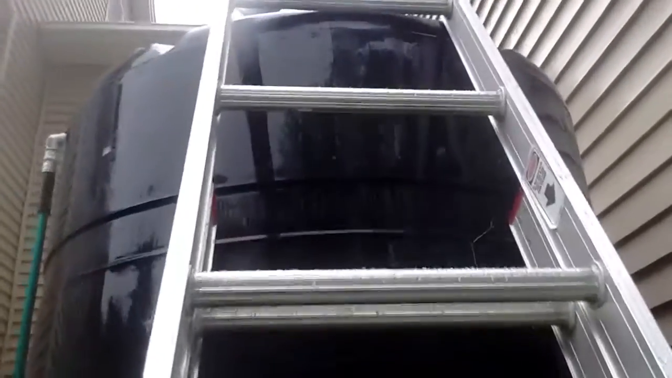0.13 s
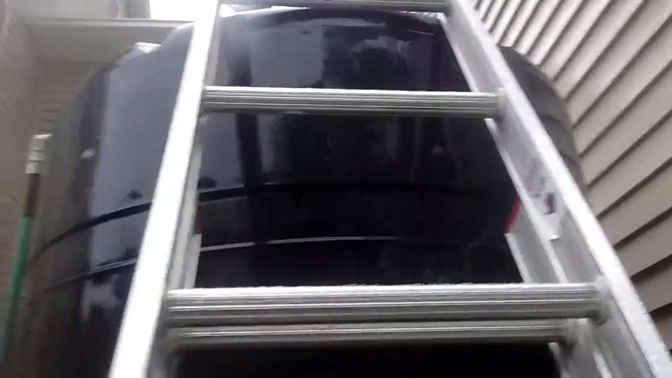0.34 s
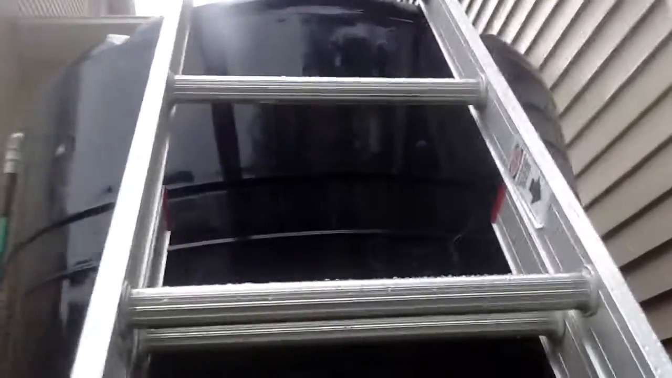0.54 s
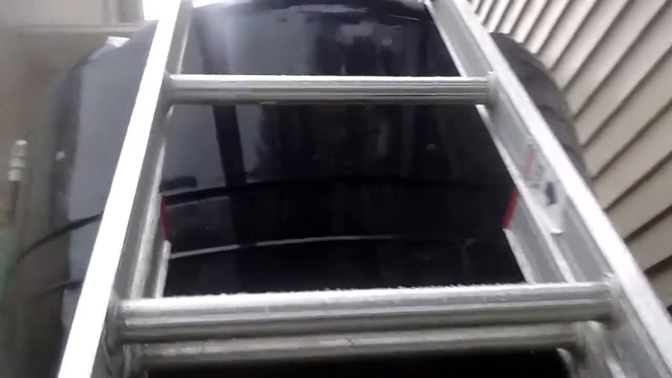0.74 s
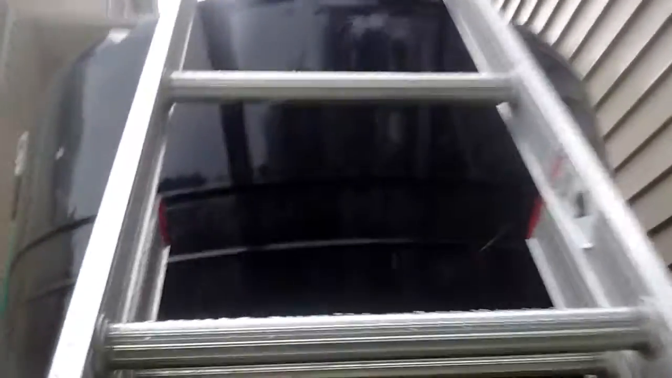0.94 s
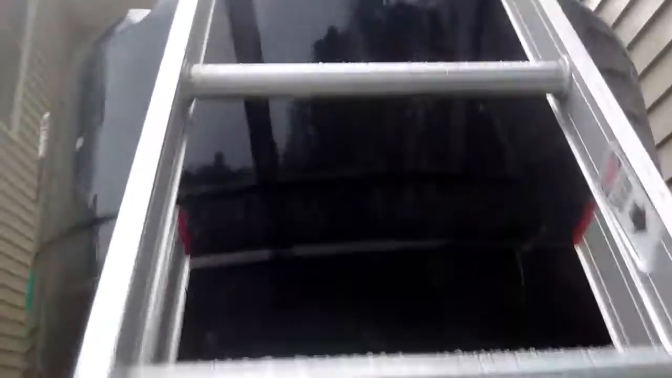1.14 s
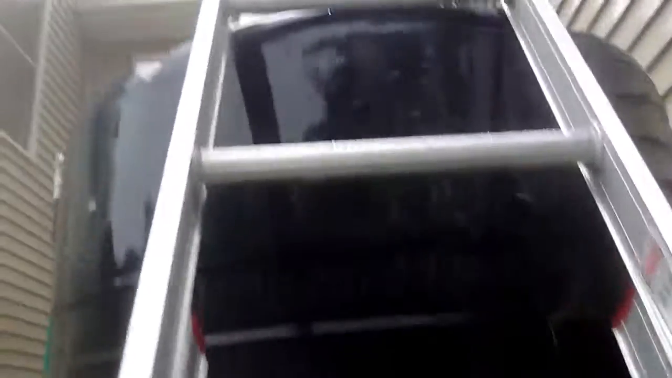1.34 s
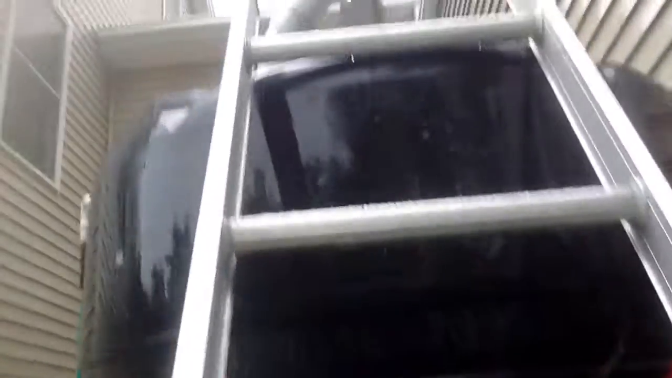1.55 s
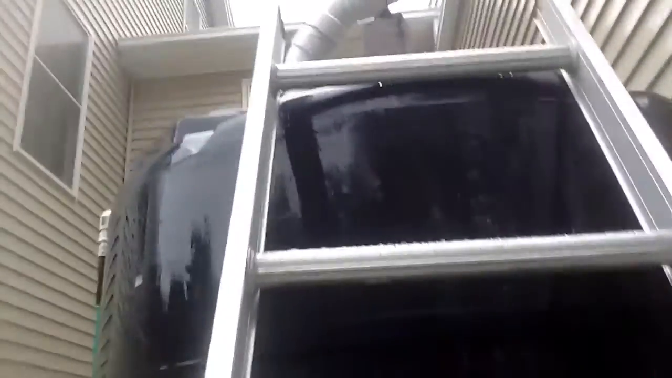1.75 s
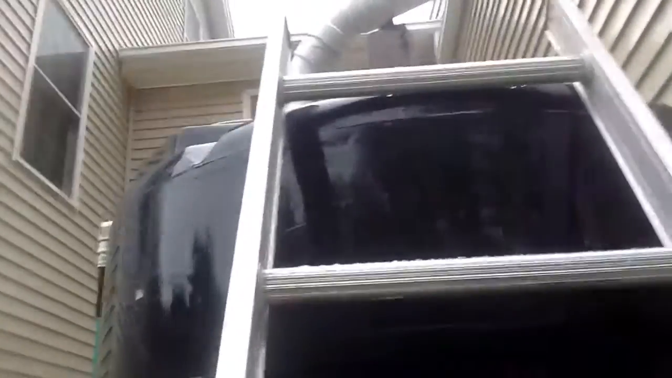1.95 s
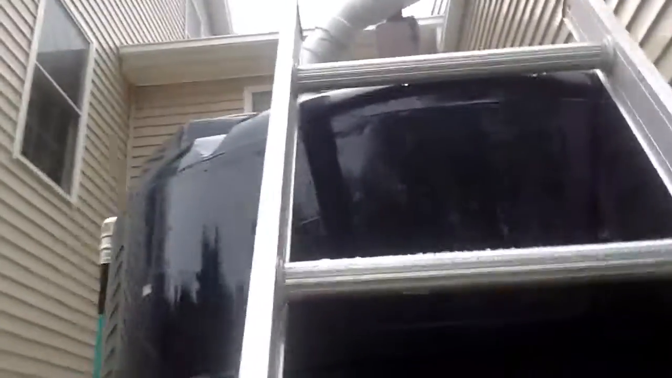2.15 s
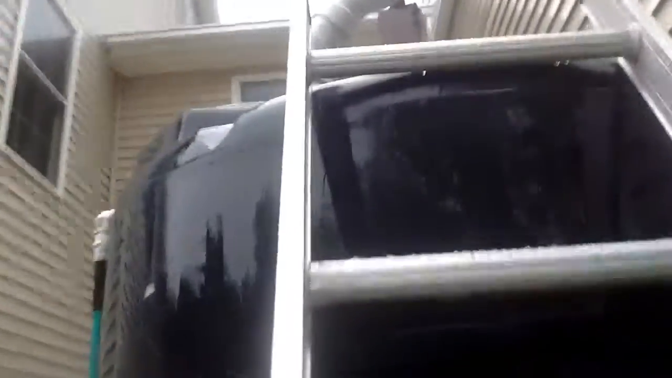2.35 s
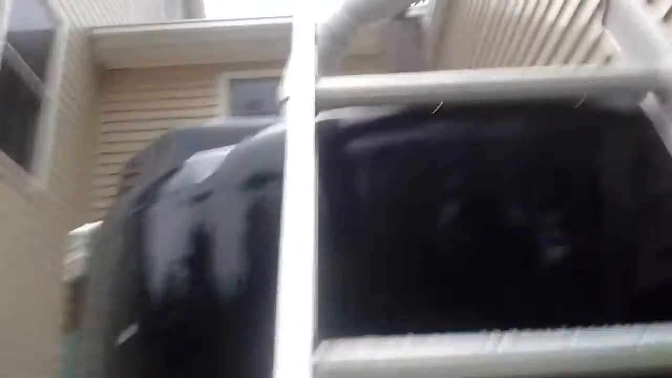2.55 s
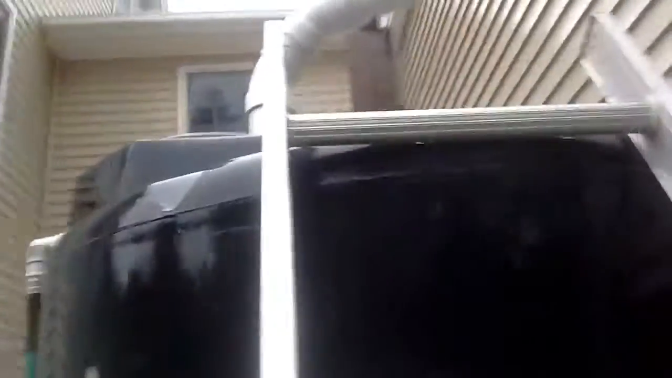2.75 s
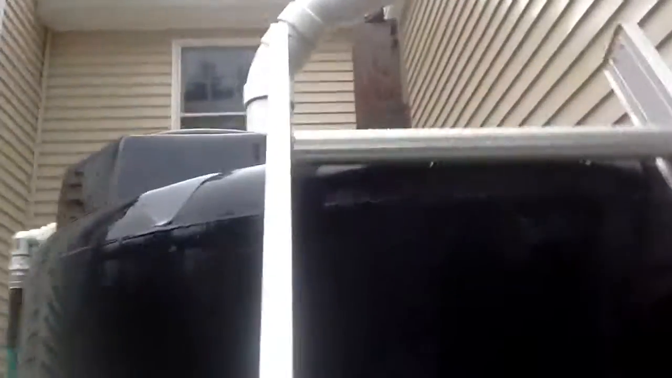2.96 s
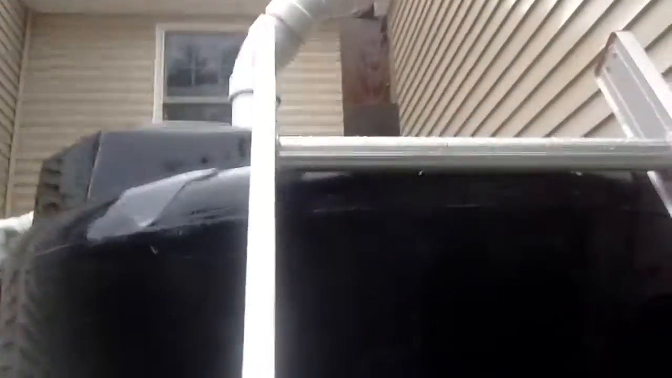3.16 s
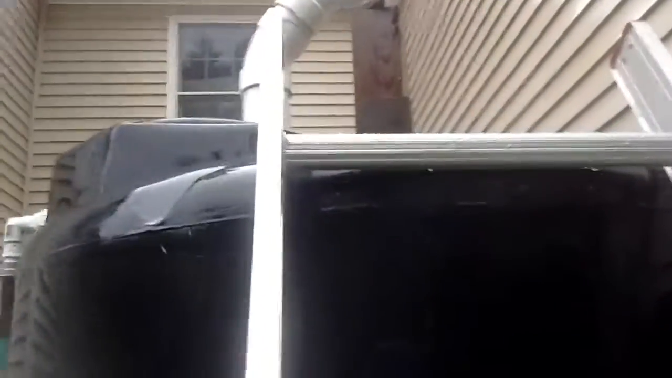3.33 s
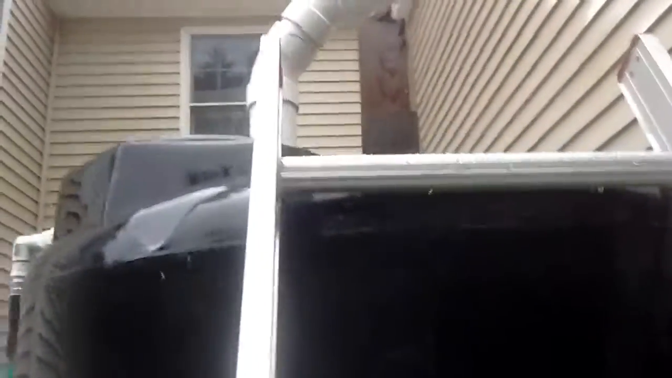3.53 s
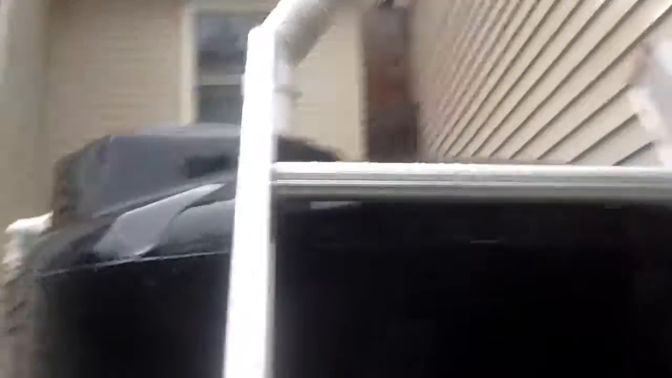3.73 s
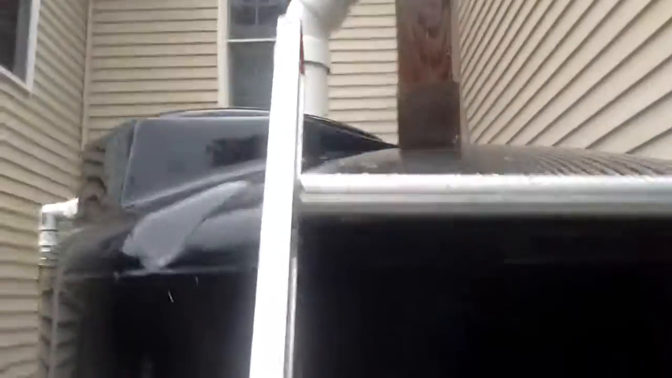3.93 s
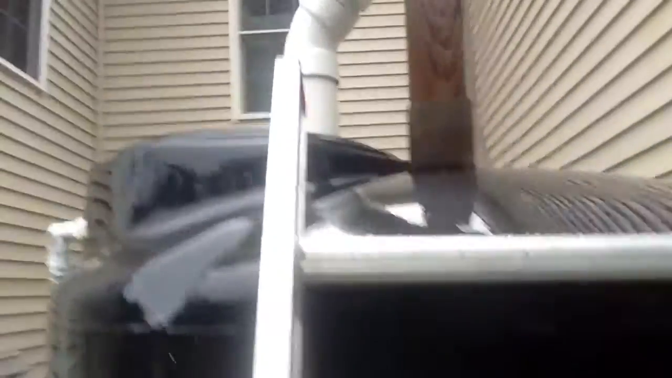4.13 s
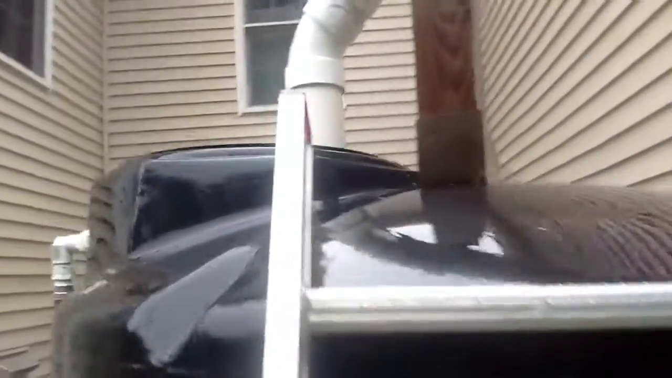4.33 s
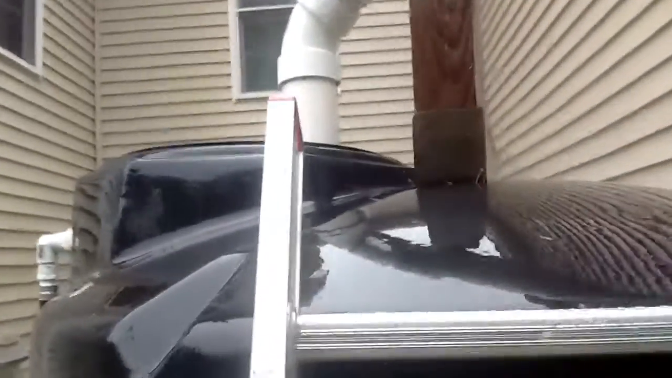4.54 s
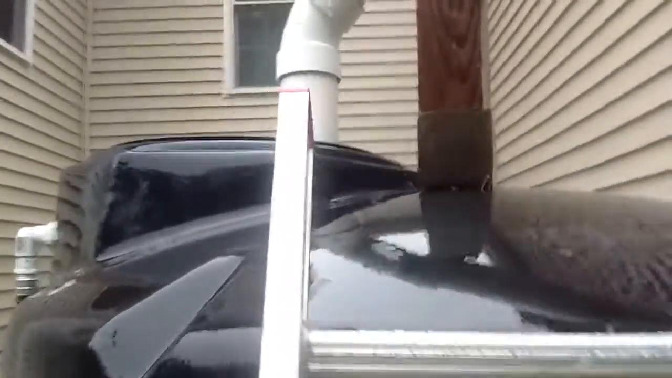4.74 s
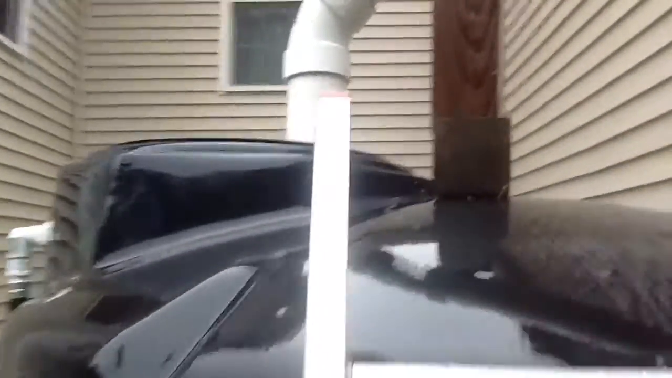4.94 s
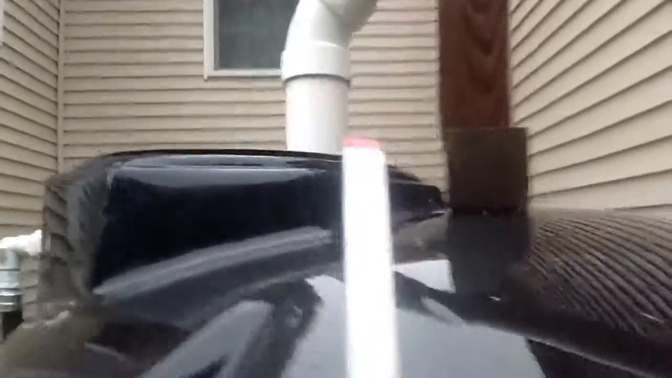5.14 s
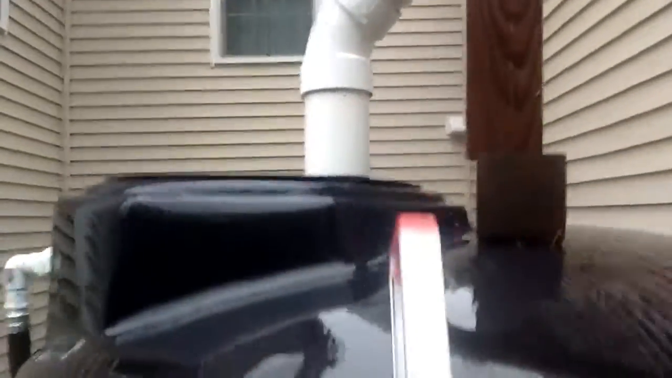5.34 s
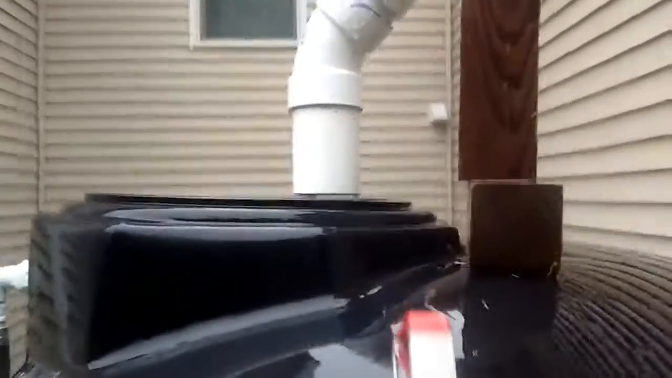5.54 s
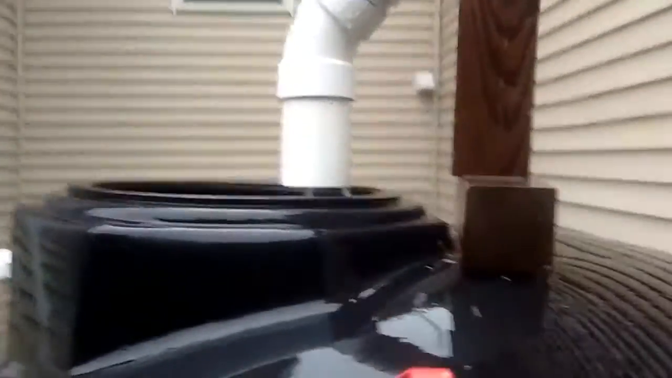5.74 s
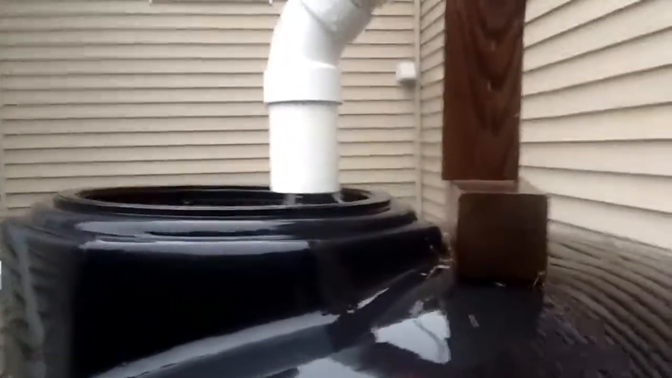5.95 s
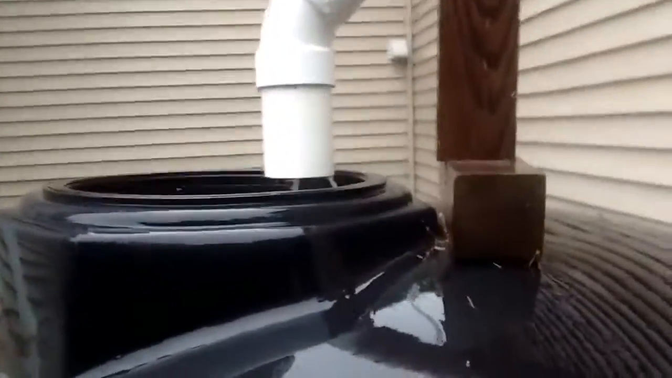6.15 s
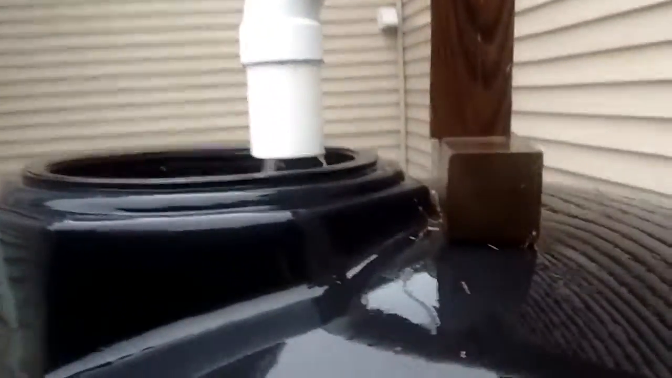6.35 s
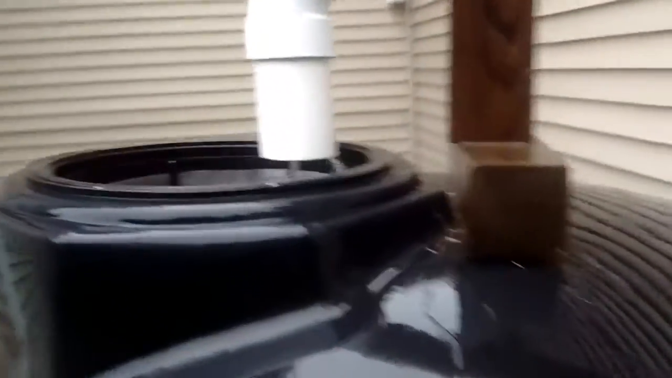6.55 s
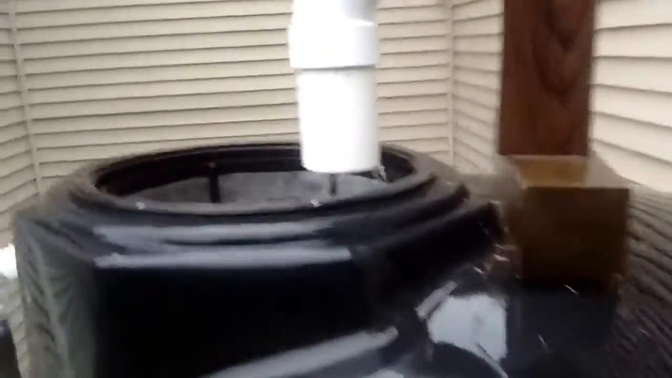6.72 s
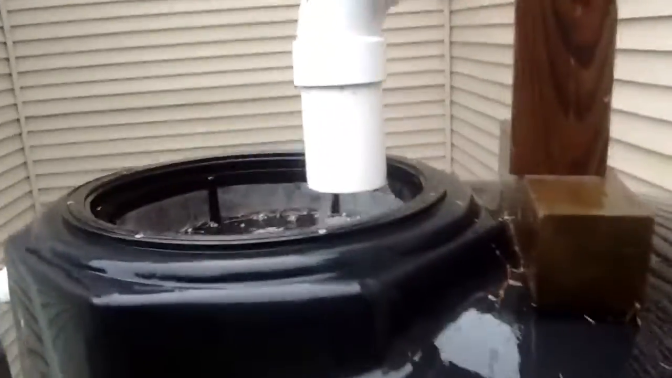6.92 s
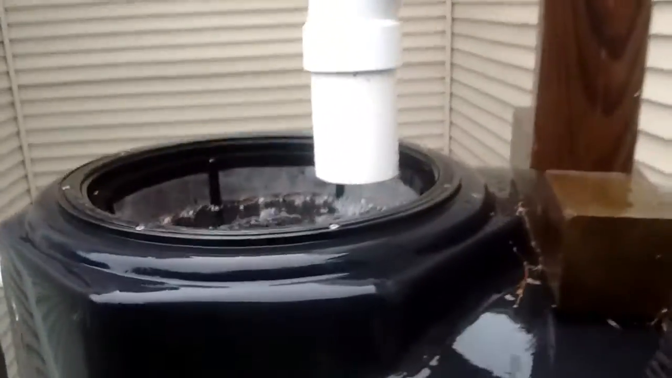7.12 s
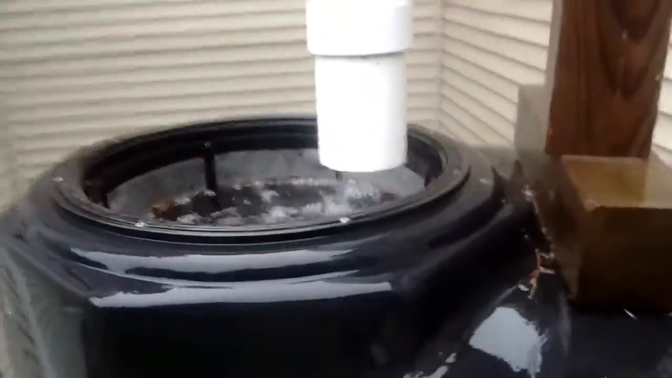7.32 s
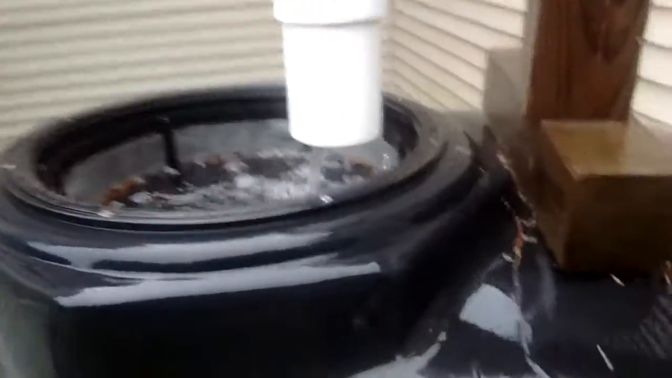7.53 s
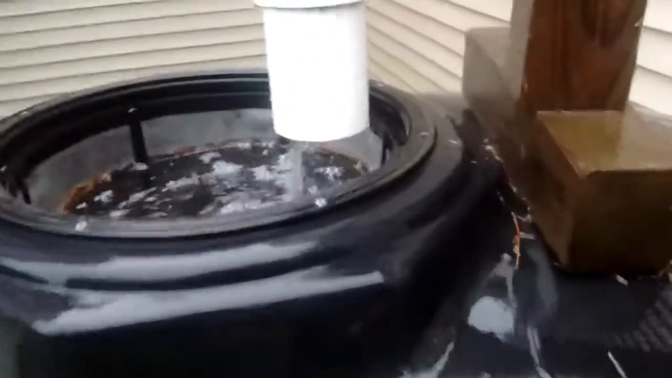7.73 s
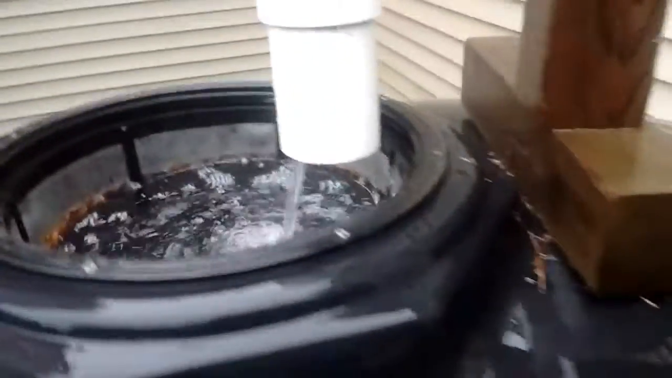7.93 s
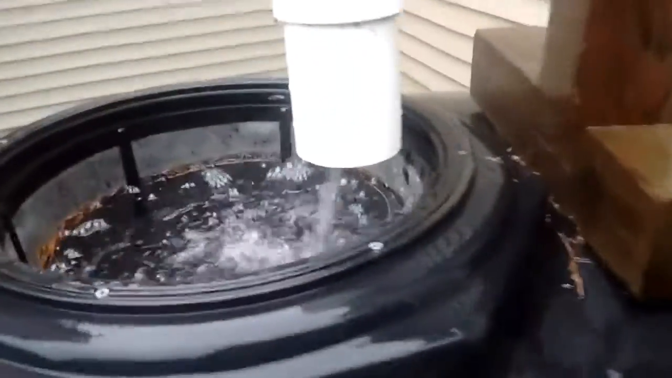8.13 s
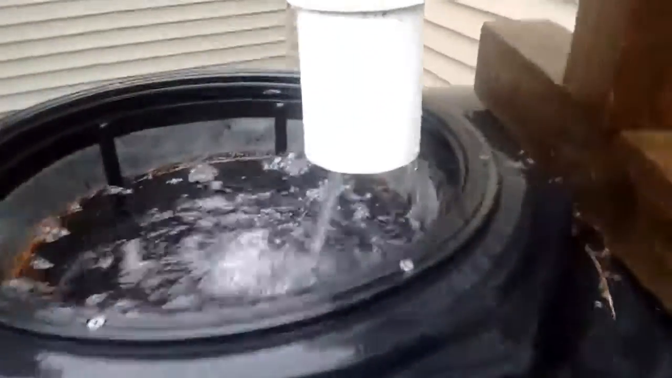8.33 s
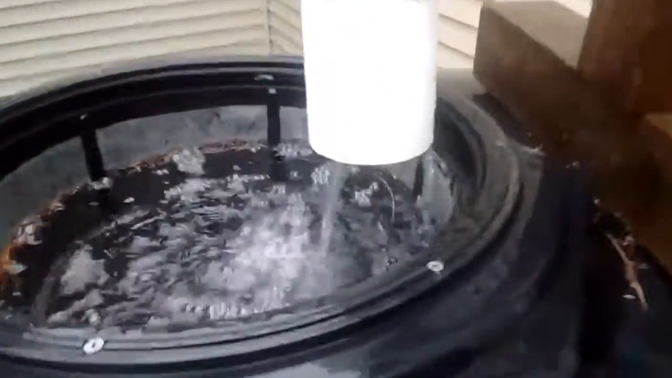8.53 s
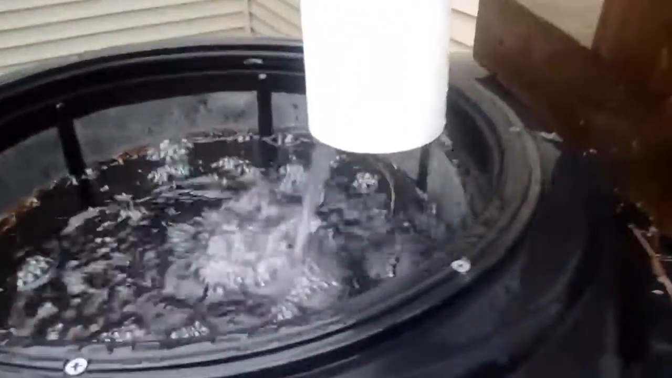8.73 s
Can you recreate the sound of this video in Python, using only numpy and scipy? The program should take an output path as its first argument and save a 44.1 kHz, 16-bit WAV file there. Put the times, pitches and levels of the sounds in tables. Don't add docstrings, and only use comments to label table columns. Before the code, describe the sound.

Close stereo phone pickup in light rain: a soft broad hiss, irregular hard clicks and dull thuds of drips near the microphones. Two short rattling ladder knocks come in the first two seconds. After about six seconds water gurgles deep in a tank, then splashes brightly and nearer to the end. The hiss dips after loud hits and recovers.

```python
import sys
import numpy as np
from scipy import signal
from scipy.fft import rfft, irfft, next_fast_len
from scipy.io import wavfile
from scipy.ndimage import uniform_filter1d

SR = 44100
rng = np.random.default_rng(int(sys.argv[2]) if len(sys.argv) > 2 else 0)


def volts_from_decibels(level):
    exponent = np.asarray(level, float) / 20
    return 10 ** exponent


def digitize_waveform(pressure):
    field = np.atleast_2d(pressure).T
    bounded = np.clip(field, -1, 1)
    quanta = np.round(bounded * 32767).astype(np.int16)
    wavfile.write(sys.argv[1], SR, quanta)


N = 391608
LENGTH = next_fast_len(N)
HZ = np.maximum(np.fft.rfftfreq(LENGTH, 1 / SR), 1)
PORT_LAG = 14.04

# start_s, level_db, brightness_hz,
# rattle_t60_s
TOUCHES = [(0.781, -24, 1000, 0.023), (0.814, -9.5, 7440, 0.093), (.83, -19.5, 3100, 0.26),
           (.828, -20, 3000, 0.03), (.853, -26, 1800, 0.033), (.868, -27, 1300, 0.04),
           (.94, -25, 2500, 0.039), (1.532, -24, 1500, 0.025), (1.556, -15, 4500, 0.03),
           (1.564, -8.5, 5800, 0.063), (1.5646, -4, 10300, 0.018), (.813, -7, 6000, 0.012),
           (1.576, -16.5, 3400, 0.3), (1.598, -19, 2000, 0.03), (1.62, -20, 1500, 0.044),
           (1.632, -20, 1410, 0.11), (1.681, -31, 1500, 0.057), (2.294, -26, 596, 0.03),
           (3.5, -23, 650, 0.18), (6.279, -20, 636, 1)]


def rms_one(x):
    return x / np.sqrt(np.mean(x ** 2) + 1e-20)


def butter2(x, hz, kind="low"):
    return signal.sosfilt(signal.butter(2, hz, kind, fs=SR, output="sos"), x)


def at_hz(points):
    hz, db = np.transpose(points)
    return volts_from_decibels(np.interp(np.log(HZ), np.log(hz), db))


def drift(rate_hz):
    r = np.exp(-80 * np.pi * rate_hz / SR)
    slow = signal.lfilter([1], [1, -2 * r, r * r], rng.standard_normal(N // 40 + 2002))[2000:]
    return np.interp(np.arange(N) / 40, np.arange(len(slow)), rms_one(slow))


def grains(per_s, spread_db):
    sizes = volts_from_decibels(spread_db * np.minimum(rng.exponential(1, N), 3))
    signs = rng.choice([-1, 1], N)
    return rms_one(sizes * signs * (rng.random(N) < per_s / SR))


def resonances(x, modes):
    out = np.zeros(N)
    for k, (hz, width, db) in enumerate(modes):
        r = np.exp(-np.pi * width / SR)
        feedback = [1, -2 * r * np.cos(2 * np.pi * hz / SR), r * r]
        ring = signal.lfilter([(1 - r * r) / 2, 0, (r * r - 1) / 2], feedback, x)
        out += (-1) ** k * volts_from_decibels(db) * ring
    return out


def ports(x, lag, pan_db=0):
    turn = np.exp(-1j * np.pi * HZ * lag / SR)
    spectrum = rfft(x, LENGTH)
    both = irfft([spectrum * turn, spectrum / turn], LENGTH)[:, :N]
    return both * volts_from_decibels(np.array([[pan_db / 2], [-pan_db / 2]]))


def drip_rows():
    # start_s, level_db, pitch_hz, left_lag_samples
    on_leaves = [(.045, -27, 420, 15), (0.101, -22, 430, 15), (0.191, -19, 513, 15), (0.406, -18, 600, 14),
                 (5.762, -18, 900, 15), (.129, -16, 322, 17), (0.496, -25, 343, 12), (.667, -19, 336, 15),
                 (1.18, -19, 350, 15), (1.246, -20, 650, 12), (1.556, -19.5, 139, 14),
                 (1.632, -22.5, 282, 8.3), (1.682, -26, 200, 13), (1.845, -13.5, 247, 13),
                 (1.854, -19, 450, 9), (2.281, -19.5, 347, 11), (2.455, -25, 710, 15),
                 (2.515, -8.5, 545, 16), (2.84, -14.5, 1180, 18), (3.237, -24, 475, 16),
                 (3.278, -19, 650, 15), (3.418, -13, 443, 16), (3.454, -12, 475, 16),
                 (3.558, -11.5, 430, 13), (3.645, -8.5, 390, 22), (3.8, -16, 453, 13),
                 (3.872, -3.5, 1800, 14), (4.993, -13, 332, 12), (6.08, -1, 1640, 15),
                 (6.493, -12.5, 477, 14), (6.565, -11.5, 750, 15), (7.985, 1, 1060, 8.3)]
    # start_s, crack_db, thump_db, thump_hz
    on_tank = [(.215, -25, -38, 580), (0.233, -24, -30, 1570), (.251, -33, -29, 240), (.402, -14, -14, 417),
               (1.238, -24, -33, 730), (1.538, -30, -18.5, 474), (2.422, -22.5, -21, 354),
               (2.761, -23, -25, 324), (2.779, -22.5, -19, 274), (3.177, -17.5, -19, 305),
               (4.105, -17.5, -8.5, 493), (4.2079, -14, -22, 1760), (4.495, -10, -6.5, 900),
               (4.572, -26, -17.5, 264), (4.66, -11, -13.5, 494), (5.012, -18, -17, 855),
               (5.14, -22.5, -24, 600), (6.693, -14, -19.5, 433), (7.5836, -15.5, -16.5, 210),
               (7.72, -17.5, -11.5, 394), (8.55, -17, -11, 430)]
    # start_s, level_db, pitch_hz,
    # left_lag_samples
    on_rails = [(.16, -13, 3170, 15), (.289, -3.5, 3470, 14), (.604, -24, 2360, 15), (.784, -21, 5600, 6.5),
                (1.079, -28.5, 2860, 2.5), (1.382, -32, 1800, 15), (1.895, -21, 2290, 13.5),
                (2.017, -22.5, 4800, -2), (2.751, -23, 1840, 15), (2.933, -14, 3500, 18),
                (2.676, -26, 2300, 13), (2.911, -27.5, 1510, 15), (2.991, -30, 1710, 15),
                (3.035, -24, 4400, 15), (3.08, -30.5, 1300, 15), (4.595, -27, 1000, 15),
                (4.478, -35, 1500, 15), (3.197, -4, 7840, -14), (3.479, -8.5, 2800, 14),
                (3.668, -15, 3160, 14), (4.7, -29.5, 1810, 7), (4.914, -22, 3150, 15),
                (5.171, -24.5, 2000, -14), (5.328, -20, 3640, -13.5), (5.846, -19, 2720, -6),
                (6.205, -15, 2200, -10), (6.637, -8.5, 3400, 16), (6.8246, -9.5, 2980, 14.5),
                (7.197, -13, 4500, 15), (8.107, -17, 1900, 15), (8.21, -10, 8100, -8.5),
                (1.566, 8, 8100, 15), (4.6603, -10, 4200, 13), (4.994, -22, 1480, 15),
                (5.011, -15.5, 4200, 17), (0.813, -22, 1300, 15), (4.202, -11.5, 3480, 18),
                (4.66, 1, 8300, 14.5)]
    # start_s, level_db, pitch_hz, left_lag_samples
    in_water = [(2.295, -24, 238, 8.5), (2.312, -15.5, 490, 4), (2.323, -21, 560, 3), (3.504, -16, 150, 2),
                (3.604, -12.5, 161, -20), (4.305, -26, 240, -5), (5.551, -17, 420, 4),
                (5.782, -17.5, 455, -9), (5.985, -9, 420, -2.5), (6.008, -12.5, 219, 7),
                (6.24, -5, 474, -10.5), (6.283, -4, 447, 3.5), (7.176, -13, 386, -5.5),
                (7.74, -11, 243, -5), (7.793, -9, 417, -4.5), (5.868, -23, 411, 4), (6.085, -19, 380, 5.5),
                (6.549, -13.5, 370, 7), (6.62, -15, 417, 4.5), (6.761, -17, 390, 2), (6.892, -23, 370, 6),
                (6.939, -22, 344, -1), (6.985, -18, 550, 5), (7.071, -18, 370, 8), (7.131, -21, 400, 2),
                (7.441, -16, 400, -1), (7.56, -13, 390, 5), (7.665, -19, 370, 4), (8.054, -17, 393, 5.5),
                (8.29, -16, 397, 4), (8.39, -17, 400, 6), (8.675, -14, 410, 6.5), (8.79, -9, 334, 4.5)]
    soft_crack_hz = 2200
    rows = [(s, db - 18, soft_crack_hz, db, hz, lag) for s, db, hz, lag in on_leaves]
    rows += [(s, crack_db, 1980, thump_db, hz, PORT_LAG) for s, crack_db, thump_db, hz in on_tank]
    rows += [(s, db, hz, db - 52, 315, lag) for s, db, hz, lag in on_rails]
    rows += [(s, db - 23, soft_crack_hz, db, hz, lag) for s, db, hz, lag in in_water]
    return rows


def drips():
    crack_cycles, thump_cycles, sag_cycles = 1.52, 2.63, 0.355
    out, t, rows = np.zeros((2, N + 2000)), np.arange(2000) / SR, drip_rows()
    spray = butter2(rng.standard_normal((len(rows), 2000)), [6000, 11000], "band")
    for (s, crack_db, crack_hz, thump_db, thump_hz, lag), noise in zip(rows, spray):
        at = int(s * SR) - 24
        lag = np.clip(lag, -PORT_LAG - 1, PORT_LAG + 1)
        solid = lag > 8.5 or thump_hz < 200
        crack_t60 = 2 * crack_cycles / crack_hz
        thump_t60 = 2 * thump_cycles * (1 if solid else 2) / thump_hz
        for port, late in enumerate((lag / 2, -lag / 2)):
            age = np.maximum(t - (12 + late) / SR, 0)
            contact = 1 - np.exp(-age / .00009)
            crack = volts_from_decibels(crack_db + 14.0 - 60 * age / crack_t60) * np.sin(2 * np.pi * crack_hz * age)
            burst = np.exp(-age / 0.00026) * (age > .0002)
            snap = volts_from_decibels(crack_db - 0.5) * burst * np.interp(age * SR, np.arange(2000), noise)
            sag = sag_cycles * (1 - np.exp(-age / 0.00014)) * (thump_hz < 700) * solid
            thump = volts_from_decibels(thump_db + 0.5 - 60 * age / thump_t60) * np.sin(2 * np.pi * (thump_hz * age + sag))
            swell = 1 - np.exp(-age / 0.00017)
            out[port, at:at + 2000] += contact * (snap - crack) - swell * thump
    return out[:, :N]


def rattle():
    out, t = np.full(N, 1e-18), np.arange(SR // 4) / SR
    noises = rng.standard_normal((len(TOUCHES), len(t)))
    for (s, db, bright_hz, t60), noise in zip(TOUCHES, noises):
        soft = butter2(noise * volts_from_decibels(-60 * t / t60), bright_hz)
        out[int(s * SR):][:len(t)] += volts_from_decibels(db) * soft / np.sqrt(bright_hz / 5000)
    return out * volts_from_decibels(2.4 * drift(130))


def strikes():
    out = np.full(N, 1e-18)
    for s, db, bright_hz, t60 in TOUCHES:
        if t60 < .1:
            blow = butter2(np.arange(400) == 0, bright_hz)
            out[int(s * SR):][:400] += volts_from_decibels(db) * np.sqrt(t60 * SR) * blow
    return out


def ladder():
    # pitch_hz, level_db, t60_s
    rail_rings = [(745, -7, 0.16), (900, -11, 0.071), (1060, 1, 0.29), (1147, 2.5, 0.39), (1750, -6, 0.3),
                  (1281, -1.5, 0.08), (1520, -8, 0.066), (1680, -7, 0.22), (1930, -8, .1),
                  (2200, -0.5, 0.13), (2470, -1, 0.11), (2720, -8, 0.1), (4200, -5, 0.051),
                  (4500, -11, 0.11)]
    # pitch_hz, level_db, t60_s
    frame_rings = [(266, -16, 0.19), (450, -12, 0.13), (560, 5, 0.24), (575, 4, 0.78), (618, 5, 0.3)]
    rail_modes = [(hz, 2.75 / t60, db) for hz, db, t60 in rail_rings]
    frame_modes = [(hz, 2.75 / t60, db) for hz, db, t60 in frame_rings]
    rails = sum(ports(volts_from_decibels(3.5) * resonances(rattle(), rail_modes), lag) for lag in (PORT_LAG, -PORT_LAG))
    struck = ports(volts_from_decibels(1.5) * resonances(strikes(), rail_modes), PORT_LAG)
    frame = volts_from_decibels(13.5) * resonances(rattle(), frame_modes) + volts_from_decibels(-19.0) * resonances(strikes(), frame_modes)
    chatter = volts_from_decibels(-3.0) * butter2(rattle(), 500, "high")
    return rails + struck + ports(frame, -2.4) + ports(chatter, -13.2)


def churn(modes, per_s, noise_share, surge_db, own_db, own_rate):
    surge = surge_db * drift(7.6)
    bubbles = grains(per_s, 5.0) + noise_share * rng.standard_normal(N)
    out = np.zeros(N)
    for k, mode in enumerate(modes):
        drive = 0.53 * bubbles + np.roll(bubbles, 4099 * k)
        out += (-1) ** k * resonances(drive * volts_from_decibels(surge + own_db * drift(own_rate)), [mode])
    return rms_one(out)


def glugs(per_s, low_hz, high_hz, cycles):
    clicks, dealt = grains(per_s, 3.6), rng.integers(0, 8, N)
    out = np.zeros(N)
    for k, hz in enumerate(np.geomspace(low_hz, high_hz, 8)):
        note = [(hz, hz / cycles, 0)]
        out += resonances(resonances(clicks * (dealt == k), note), note)
    return rms_one(out)


def small_drips(per_s, cycles, low_hz=1200):
    clicks, dealt = grains(per_s, 4.0), rng.integers(0, 12, N)
    out = np.zeros(N)
    for k, hz in enumerate(np.geomspace(low_hz, 5000, 12)):
        out += resonances(clicks * (dealt == k), [(hz, hz / cycles, 0)]) / np.sqrt(hz)
    return rms_one(out)


def pour():
    # pitch_hz, width_hz, level_db
    tank_air = [(178, 51, -4), (232, 37, 0), (304, 62, -5.5), (370, 35, -8.5), (450, 67, -13.5),
                (600, 59, -10.5)]
    # pitch_hz, width_hz, level_db
    pipe_air = [(1000, 61, -30), (1430, 62, 5.5), (2030, 213, 4.5), (2350, 71, 10), (3150, 1000, 1),
                (4200, 91, 2), (4470, 110, -2.5), (8300, 3700, -13), (11200, 36000, -21.5)]
    # time_s, splash_level_db
    nearness = [(0, -46), (1, -40.5), (2, -43.5), (3.5, -43.5), (4.7, -40), (5.6, -41), (5.92, -39.5),
                (6.25, -41), (6.4, -37.5), (6.75, -40.5), (6.9, -35), (7.45, -33), (7.66, -33.5),
                (7.9, -33.5), (8.24, -36), (8.33, -32.5), (8.5, -34), (8.88, -34.5)]
    t = np.arange(N) / SR
    splash_db = np.interp(t, *np.transpose(nearness))
    rim_db = 4.5 * np.exp(-((t - 6.33) / 0.75) ** 2)
    gurgle_db = -33 + 0.55 * (splash_db - splash_db.mean()) + rim_db
    gurgle = churn(tank_air, 150, .9, .9, 2.8, 10)
    pockets = .22 * glugs(18, 220, 520, 6)
    splash = churn(pipe_air, 600, .4, 1.2, 3.4, 30) + .5 * small_drips(350, 14)
    return (ports(gurgle * volts_from_decibels(gurgle_db), -1.8)
            + ports(pockets * volts_from_decibels(gurgle_db), -10.0)
            + ports(splash * volts_from_decibels(splash_db), -PORT_LAG, pan_db=5.0))


def plops():
    # start_s, level_db, pitch_hz
    booms = [(5.479, -33, 367), (5.907, -14.5, 196), (6.167, -23, 183), (6.285, -16.5, 176),
             (6.545, -16, 236), (6.661, -24, 232), (6.765, -33, 233), (6.991, -27, 254), (7.071, -22, 374),
             (7.348, -47, 570), (7.454, -25, 243), (7.5, -25, 348), (8.308, -30.5, 372), (8.452, -19, 250),
             (8.736, -18, 234), (8.762, -16, 232)]
    # start_s, level_db, pitch_hz
    plinks = [(8.64, -18, 1470), (6.079, -18.5, 1106), (6.262, -18.5, 2600), (6.761, -17.5, 2170),
              (7.395, -17.5, 2380), (7.538, -13.5, 2030), (7.555, -24, 4800), (8.613, -9.5, 2110),
              (8.556, -22, 4570), (6.756, -23.5, 2040), (6.731, -21, 2280), (6.462, -27, 2200),
              (6.621, -17, 2350), (6.677, -19.5, 2300), (7.935, -25, 5100), (7.985, -20.5, 4400),
              (7.986, -18.5, 1580), (8.034, -19.5, 2450), (8.077, -18, 2780), (8.109, -24.5, 840),
              (8.239, -21, 4540), (8.353, -18, 4300), (8.356, -16, 2940), (8.4, -20.5, 5230),
              (8.55, -26, 1060), (8.578, -14, 3250), (8.667, -16, 2780), (8.733, -16, 2940),
              (8.827, -16, 2730), (8.424, -19, 2810), (8.594, -21, 4560), (7.361, -28.5, 1000),
              (8.01, -24, 2700), (8.193, -22, 2000), (8.62, -16.5, 4730), (8.622, -11, 3020)]
    # start_s, level_db, pitch_hz
    pipe_notes = [(5.3926, -32, 1220), (5.4929, -28, 1390), (5.5707, -28, 1430), (5.8661, -26, 2350),
                  (5.8914, -31, 2330), (5.9354, -31, 1860), (5.9764, -38, 1540), (6.1255, -33, 1630),
                  (6.3764, -30, 2160), (6.4772, -19, 2330), (6.5176, -30, 1430), (6.9686, -26.5, 1880),
                  (7.0254, -21, 2200), (7.0963, -22.5, 2000), (7.2464, -32, 1430), (7.2799, -37, 1430),
                  (7.295, -25, 1410), (7.312, -27, 1410), (7.39, -21.5, 1430), (7.745, -29, 1420),
                  (7.812, -25, 1430), (7.24, -26, 1930), (6.9232, -27, 2030), (8.33, -23, 1410),
                  (8.49, -35, 2030), (8.53, -31, 2080), (7.3672, -25, 2300), (7.3851, -20, 2380),
                  (7.4545, -18.5, 2310), (7.4999, -18, 2300), (7.7912, -21, 2450), (7.8481, -26, 1410),
                  (7.8979, -21, 1860), (7.9418, -24, 2390), (8.0985, -22, 2080), (8.1713, -34, 1450),
                  (8.2911, -29, 1980), (8.312, -17.5, 2063), (8.4277, -18, 2100), (8.7101, -23, 2030),
                  (8.756, -27, 2040), (8.7859, -20.5, 1460), (8.8318, -23, 1360), (8.8593, -18, 1440)]
    # start_s, level_db, pitch_hz
    spatters = [(3.1956, -13.5, 3790), (5.7034, -27, 4480), (5.8915, -24, 4100), (5.9768, -24, 4100),
                (6.3325, -24, 3990), (6.4088, -23, 4890), (6.6967, -24, 4170), (7.1297, -32, 4350),
                (7.1797, -34, 3990), (7.2467, -24.5, 4600), (7.568, -10.5, 3660), (7.6296, -20, 4300),
                (7.8314, -23.5, 4383), (7.9154, -36, 4500), (8.074, -25, 3700), (8.3095, -24, 4330),
                (8.4916, -31, 4750), (8.663, -24, 4580), (8.7575, -25, 4270), (8.8248, -26, 3930)]
    rise = .018
    big, middling, small = np.zeros((3, N))
    rows = [(s, db, hz, 1) for s, db, hz in booms + plinks]
    rows += [(s + 0.00297, db - 3, hz, 1.54) for s, db, hz in pipe_notes]
    rows += [(s + 0.00134, db + 2.5, hz, 0.63) for s, db, hz in spatters]
    for s, db, hz, stretch in rows:
        cycles = 5.32 if hz < 700 else 4.74 * (hz / 1000) ** 0.41
        span = stretch * cycles / hz
        age = np.arange(int(6 * span * SR)) / SR / span
        shape = age * np.exp(1 - age * 2) * 2
        wave = volts_from_decibels(db) * shape * np.sin(2 * np.pi * hz * span * age * (1 + rise * (age - 1) / 2))
        layer = big if hz < 300 else middling if hz < 700 else small
        tail = layer[int((s - span / 2) * SR):]
        tail[:len(wave)] += wave[:len(tail)]
    small *= 1 + .45 * drift(710)
    return ports(big, -1.8) + ports(middling, -12) + ports(small, -PORT_LAG, pan_db=3)


def bursts():
    # start_s, level_db
    puff_times = [(0.287, -13), (0.4015, -23), (0.816, -5.5), (1.5638, -26), (2.734, -20), (2.7776, -27),
                  (3.077, -19), (3.1388, -17), (3.1647, -18), (3.197, -19), (3.307, -20), (3.395, -27),
                  (3.4635, -29), (3.4773, -17), (3.55, -19), (3.668, -17.5), (3.706, -30), (3.7211, -20.5),
                  (4.1055, -18), (4.2009, -25), (4.459, -22), (4.6578, -27), (5.0355, -28), (5.1682, -28),
                  (5.328, -22.5), (5.3722, -22.5), (5.843, -15), (5.9027, -18), (6.2602, -29), (6.344, -17),
                  (6.3834, -24), (6.5211, -17.5), (6.5631, -15), (6.6967, -30), (6.7815, -20), (6.937, -25),
                  (7.1327, -22), (7.1965, -27), (7.2474, -20), (7.2814, -20), (7.389, -19), (7.4629, -24),
                  (7.561, -19), (7.7912, -33), (7.806, -19), (8.208, -16), (8.308, -29), (8.3964, -11),
                  (8.4437, -22), (8.4627, -20), (8.6158, -15), (8.6637, -16), (8.739, -31), (8.7555, -30),
                  (8.8353, -29)]
    starts = np.zeros(N)
    s, db = np.transpose(puff_times)
    starts[(s * SR).astype(int) + 30] = volts_from_decibels(db + 0.5)
    fade_s = 0.0014
    puffs = signal.lfilter([1], [1, -np.exp(-1 / (fade_s * SR))], starts) * rng.standard_normal((2, N))
    return butter2(puffs, [6500, 10700], "band")


def fine_ticks():
    ends = (ports(butter2(grains(5.0, 3.0), 6000, "high"), lag) for lag in (PORT_LAG, -PORT_LAG))
    return volts_from_decibels(-63) * sum(ends)


def patter(patchy_db, grain_share):
    # pitch_hz, level_db per Hz
    rain_colour = [(25, -39), (60, 8), (300, -3.5), (550, -3), (800, -2), (1600, -1), (3200, -3.5),
                   (4600, -6.5), (6300, -11.5), (8000, -10.5), (10000, -11.5), (13000, -43), (15800, -31.5)]
    drops = rng.standard_normal(N) + grain_share * grains(900, 5.5)
    spectrum = rfft(drops, LENGTH) * at_hz(rain_colour)
    octave, together = np.clip(np.log2(HZ / 40), 1, 9), drift(27.0)
    out = np.zeros(N)
    for k in range(1, 10):
        band = irfft(spectrum * np.maximum(1 - abs(octave - k), 0), LENGTH)[:N]
        patchy = patchy_db * (0.81 * together + drift(47))
        lumps = 6 / k * drift(4.2)
        out += band * volts_from_decibels(patchy + lumps)
    return rms_one(out)


def rain():
    ends = ports(patter(1.8, .7), PORT_LAG) + volts_from_decibels(-.4) * ports(patter(1.8, .5), -PORT_LAG)
    around = sum(ports(patter(4.4, 0.76), lag) for lag in (-6.0, 5.0))
    taps = ports(small_drips(80, 3.9, low_hz=310), PORT_LAG)
    return volts_from_decibels(-34.5) * (volts_from_decibels(-4.0) * ends + volts_from_decibels(-11.0) * around + volts_from_decibels(-14.5) * taps)


def port_hiss():
    spray = butter2(rng.standard_normal((2, N)), [10500, 15000], "band")
    return volts_from_decibels(-53.0 + 2.7 * drift(14.0)) * rms_one(spray)


def port_wind():
    # time_s, level_db
    gusts = [(0.0, -77), (0.05, -65), (0.71, -82), (1.88, -66), (2.15, -89), (2.45, -72), (4.67, -64),
             (4.72, -80), (5.79, -75), (5.89, -57), (7.07, -72), (7.119, -55), (7.22, -90), (7.3, -58),
             (8.58, -70), (8.71, -66), (8.78, -89), (8.88, -53)]
    low = butter2(rng.standard_normal((2, N)), 90)
    gust_db = np.interp(np.arange(N) / SR, *np.transpose(gusts)) + 6.0
    return volts_from_decibels(gust_db) * rms_one(low * volts_from_decibels(4.9 * drift(8.6)))


def gain_control():
    # start_s, gain_just_after_db
    ducks = [(0, -0.5), (0.289, -9), (.82, -13.5), (1.575, -13), (2.516, -4), (3.248, -2), (3.48, -2),
             (3.67, -2), (3.872, -0.5), (4.104, -0.5), (4.21, -4), (4.496, -2), (4.661, -11), (6.565, 1),
             (6.823, -3.5), (7.579, -2), (7.986, -0.5), (8.22, 0.5)]
    release_db_s, full_gain_db = 10, 5.5
    s, after_db = np.transpose(ducks)
    t = np.arange(N) / SR
    last = np.maximum(np.searchsorted(s, t, side="right") - 1, 0)
    gain_db = np.minimum(after_db[last] + release_db_s * (t - s[last]), full_gain_db)
    return volts_from_decibels(uniform_filter1d(gain_db, size=88))


def scene():
    steady = rain() + pour() + port_hiss() + fine_ticks()
    hits = drips() + ladder() + plops() + bursts()
    return gain_control() * steady + port_wind() + hits


def low_pass(x):
    return signal.sosfilt(signal.butter(12, 16460, fs=SR, output="sos"), x)


def record(dry):
    # pitch_hz, level_over_left_db
    right_port = [(700, -0.5), (1300, 1), (2300, -1), (5500, -1.5), (8500, 4.5), (9800, 0), (11300, -6),
                  (14000, -9)]
    right = -irfft(rfft(dry[1], LENGTH) * at_hz(right_port), LENGTH)[:N]
    x = signal.sosfilt(signal.butter(1, 60, "high", fs=SR, output="sos"), [dry[0], right])
    mix = signal.sosfilt(signal.cheby2(10, 50, 16400, fs=SR, output="sos"), np.clip(x, -1, 1))
    return low_pass(mix)


dry = scene()
out = record(dry)
digitize_waveform(out)
```